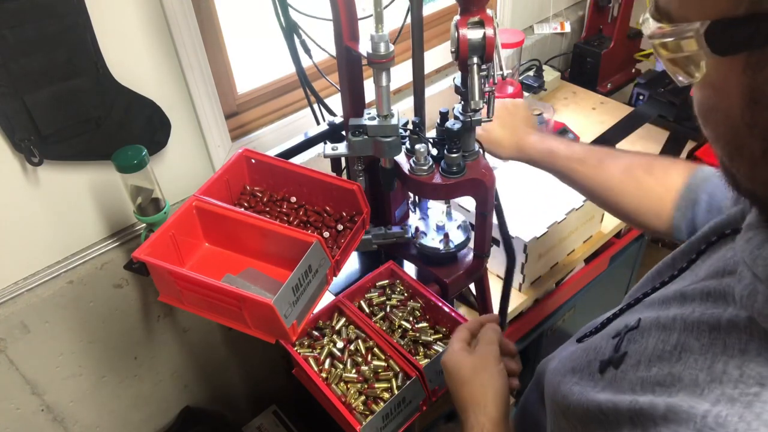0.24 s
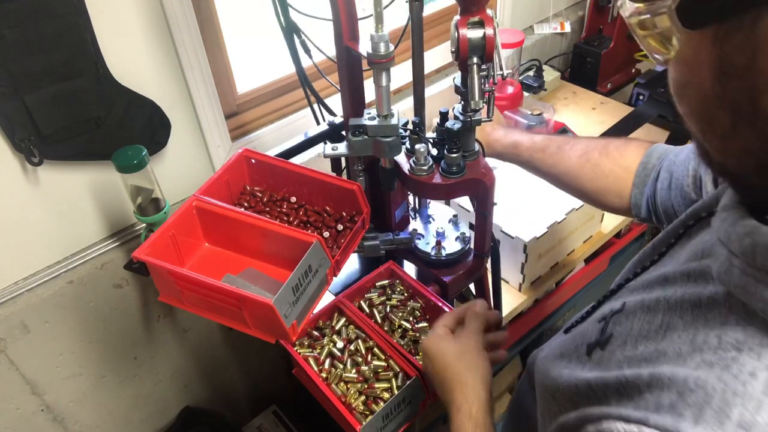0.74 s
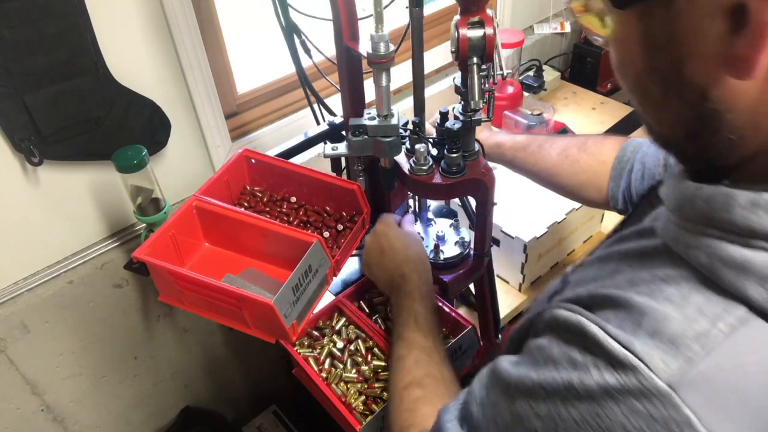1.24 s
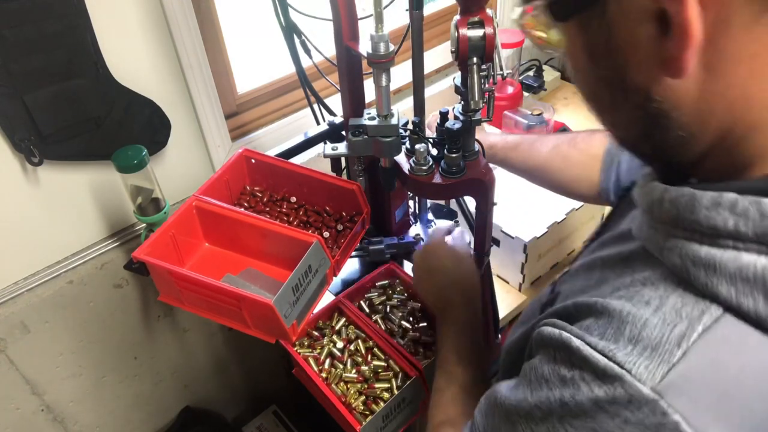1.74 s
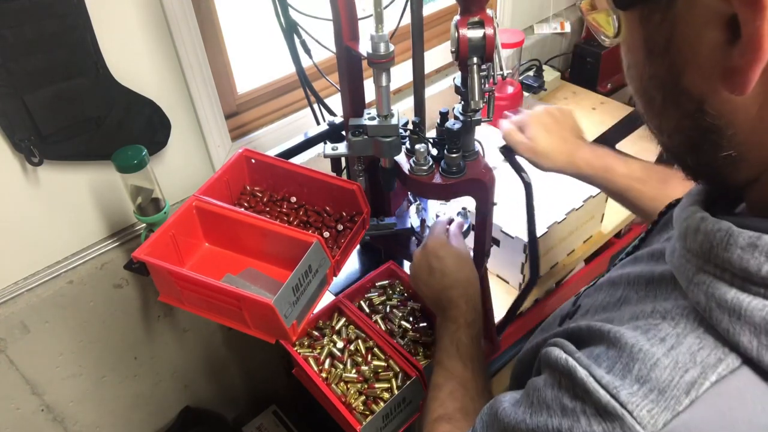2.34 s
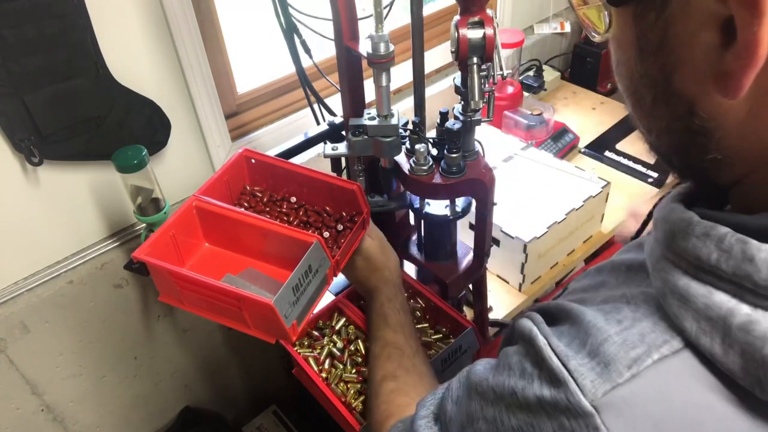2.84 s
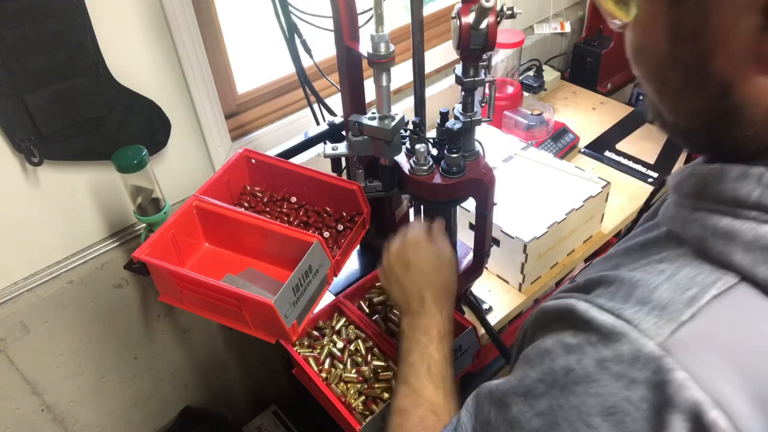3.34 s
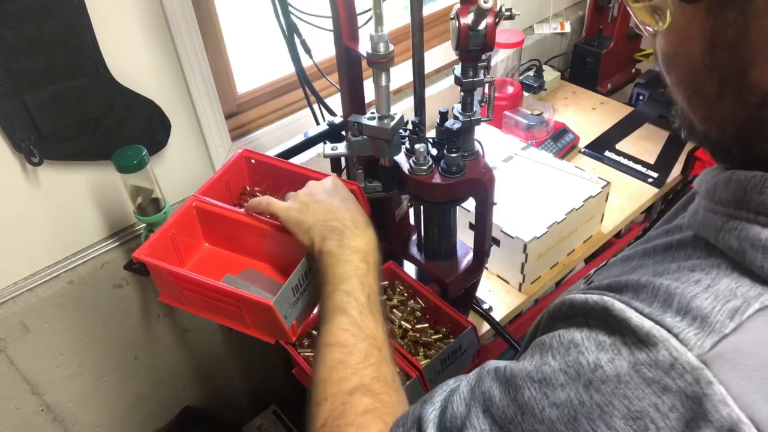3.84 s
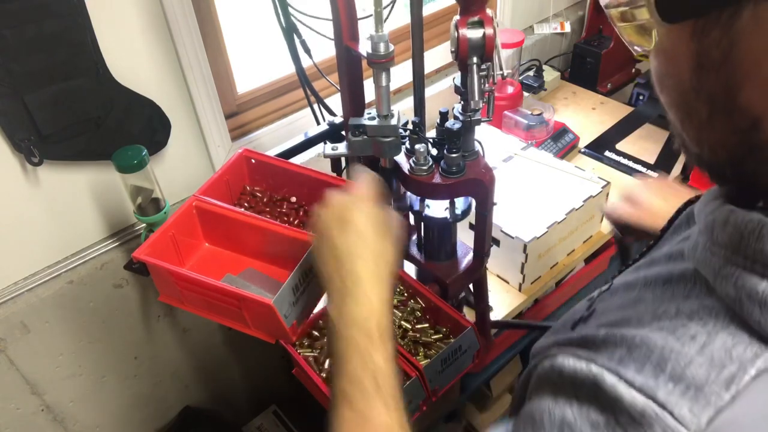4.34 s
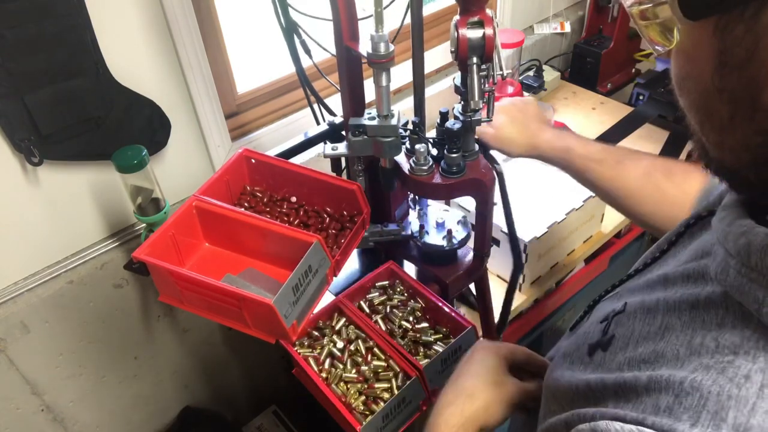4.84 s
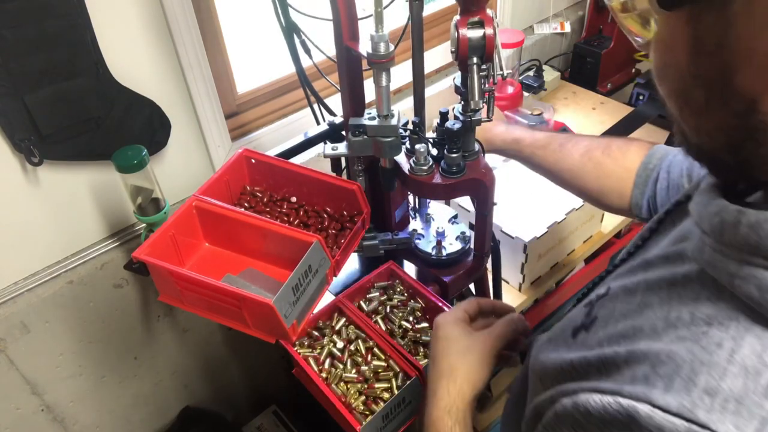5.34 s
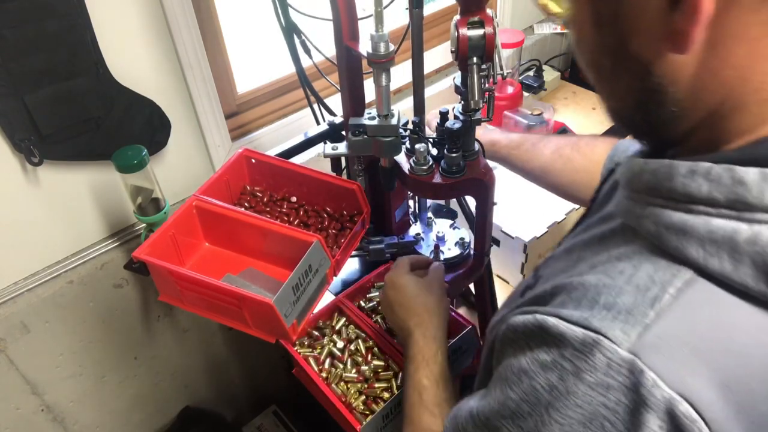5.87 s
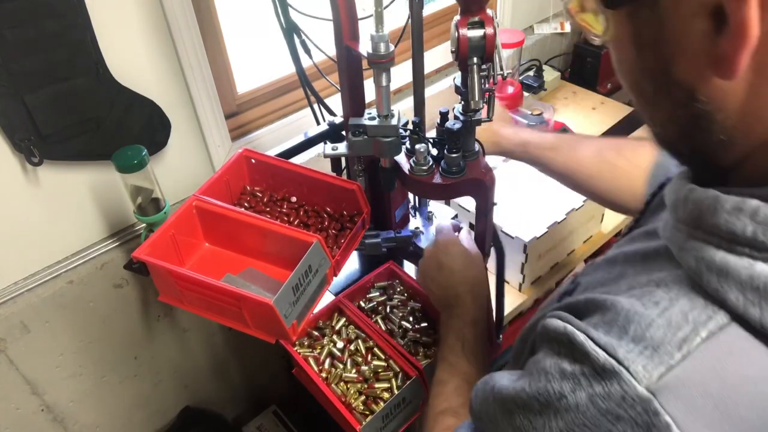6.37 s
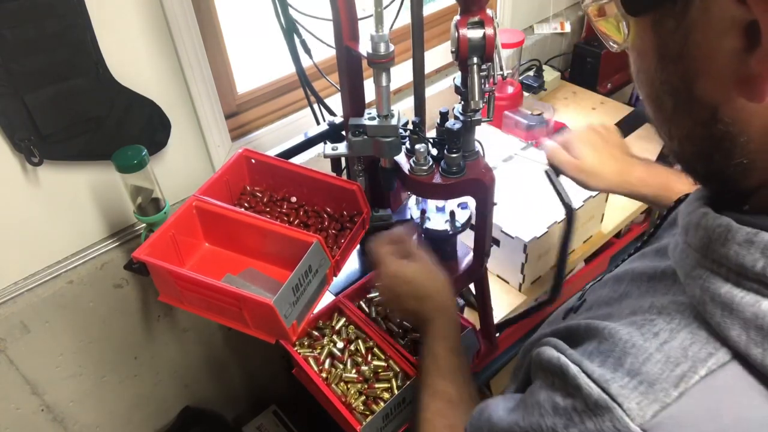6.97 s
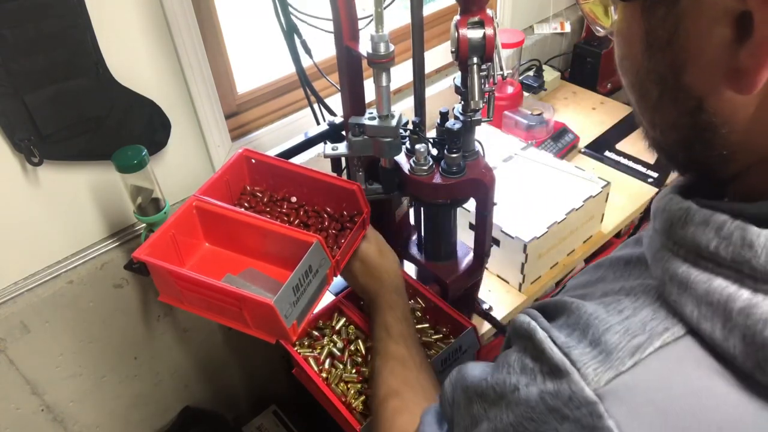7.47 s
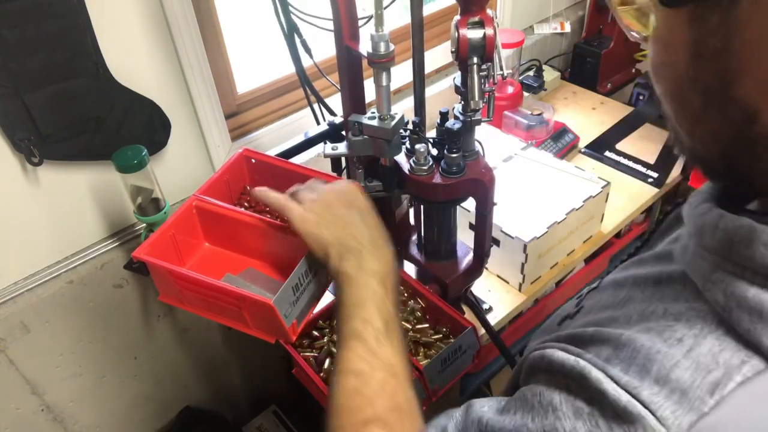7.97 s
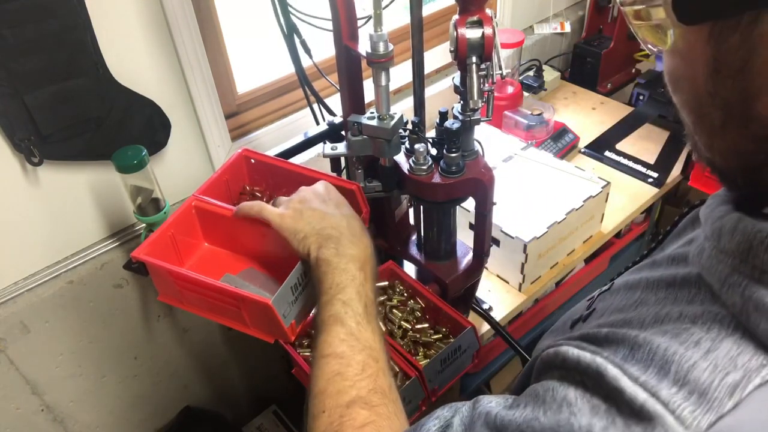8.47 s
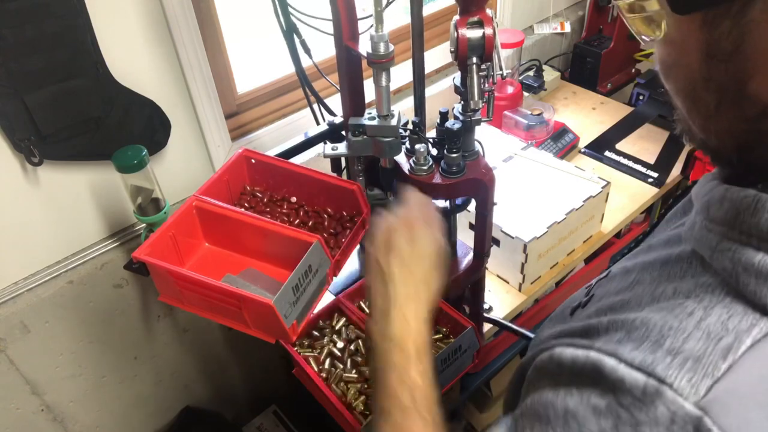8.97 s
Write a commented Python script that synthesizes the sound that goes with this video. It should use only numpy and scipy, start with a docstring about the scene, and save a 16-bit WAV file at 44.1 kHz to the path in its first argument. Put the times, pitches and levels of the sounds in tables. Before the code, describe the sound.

A few light steel clicks from a hand-worked press open over a faint electrical hum in a small workshop. At 0.5 seconds a cartridge drops sharply into a plastic bin and bounces to rest. A dull lever thud comes at 1.4 seconds, followed by sparse ticks. From 3 to 4.2 seconds, clicks, short rattles and soft bench thuds grow busier, ending in a loud metal clack. A feeder motor whirs softly from 4.3 to 6.7 seconds. Another cartridge bounces in the bin at 5.2 seconds, then brass cases tumble loudly from 5.5 to 6.5 seconds with a hollow rattle and thin, high ringing. After a lull with a few ticks, the feeder whirs again from 7.5 to 8.9 seconds, with soft thuds and more bursts of clinking, jingling cases. Two faint clicks close it at about 9 seconds.

```python
"""Steel parts click on a hand-worked loading press, over the mains hum of a small, quiet workshop.
Cartridges drop and bounce in a plastic bin, struck brass cases ring thin and high, and the lever
thuds on its stops, shaking the bench. A feeder whirs twice, tumbling cases in its resonant bowl."""
import sys
import numpy as np
from scipy import signal
from scipy.fft import rfft, irfft, next_fast_len
from scipy.io import wavfile
from scipy.ndimage import uniform_filter1d, map_coordinates

SR = 44100
rng = np.random.default_rng(int(sys.argv[2]) if len(sys.argv) > 2 else 0)


def to_wav(sig):
    """Store sig (one row per channel, or 1-D mono) as 16-bit WAV at the path in sys.argv[1].

    Samples outside -1..1 are clipped; the rate is SR.
    """
    pcm = np.clip(np.atleast_2d(sig), -1, 1) * 32767
    pcm = np.round(pcm).astype(np.int16)
    wavfile.write(sys.argv[1], SR, pcm.T)  # frames by channels


N = 406137

# plastic bin wall: pitch_hz, level_db, t60_s
BIN_MODES = [(870, -10, .025), (1000, -5, .03), (1110, 0, .035), (1292, -3, .03)]
# feeder bowl: centre_hz, width_hz, level_db
BOWL_MODES = [(350, 58, -3.5), (735, 31, 0.5), (933, 47, -1), (1103, 4, 7), (1200, 7.4, 4.5),
              (1570, 590, -10), (2860, 670, -9.5), (4340, 6100, -22.5)]
# hollow pile of cases: centre_hz, width_hz, level_db
PILE_MODES = [(347.8, 30, -2.5), (894, 157, 2), (1102, 356, -2), (1428, 220, 0.5), (1980, 384, -6.5)]
# feeder turning: start_s, end_s, level_db
FEEDER_RUNS = [(4.253, 6.652, -43), (7.465, 8.924, -41.5)]
# a round bouncing in the bin: start_s, end_s
BIN_DROPS = [(.52, 1.0), (5.18, 5.4)]


def amp(db):
    return 10 ** (np.asarray(db) / 20)


def unit_rms(x):
    return x / np.sqrt(np.mean(x ** 2) + 1e-20)


def log_interp(points, hz):
    """Interpolate (hz, value) points on a log axis."""
    points_hz, values = np.transpose(points)
    return np.interp(np.log(hz + 1), np.log(points_hz + 1), values)


def wobble(rate_hz):
    """Smooth random curve, knots at rate_hz."""
    knots = rng.standard_normal(int(N * rate_hz / SR) + 4)
    return map_coordinates(knots, [np.arange(N) * rate_hz / SR])


def filtered(x, response):
    """Apply a complex frequency response."""
    size = next_fast_len(N + SR // 2)
    return irfft(rfft(x, size) * response(np.fft.rfftfreq(size, 1 / SR)), size)[..., :N]


def band(x, lo_hz, hi_hz):
    sos = signal.butter(2, [lo_hz, min(hi_hz, .45 * SR)], "bandpass", fs=SR, output="sos")
    return signal.sosfilt(sos, x)


def resonances(modes):
    """Causal response of parallel resonators, alternating in sign."""
    return lambda hz: sum((-1) ** k * amp(db) * 1j * hz * width / (centre**2 - hz**2 + 1j * hz * width)
                          for k, (centre, width, db) in enumerate(modes))


def add(track, start_s, sound):
    part = track[round(start_s * SR):][:len(sound)]
    part += sound[:len(part)]


def room_tone():
    """Quiet air and unsteady mains hum."""
    # air spectrum: freq_hz, relative_db
    air_spectrum = [(25, -20), (64, -1.5), (100, -10), (540, -12.5), (900, -17), (3000, -31), (16000, -38)]
    air = unit_rms(filtered(rng.standard_normal(N), lambda hz: amp(log_interp(air_spectrum, hz))))
    hum = np.sin(2 * np.pi * 59.5 * np.arange(N) / SR + 0.39 * wobble(2.8))
    return amp(-59 + 1.5 * wobble(4)) * air + amp(-61.5) * hum


def contacts():
    """Metal strikes: a dry click, a sizzle and a knock on the bin wall or into the pile."""
    # strikes: start_s, level_db, optional knock_db and sizzle_db (offsets to level_db)
    hits = [(0.1148, -28), (0.159, -34), (0.295, -34), (0.367, -33.5), (0.429, -31, 4.5, 6.5),
            (0.5285, -6.5, 0.5, -15), (0.5395, -9, 2, -25), (0.5791, -12, -10, -30), (0.632, -20),
            (0.7123, -29.5), (0.8739, -20, -8.5, -5.5), (1.0159, -45, -11, 23), (1.3383, -27.5),
            (1.4473, -24, -16, -11.5), (1.896, -41.5), (2.0046, -32), (2.086, -29, 3, -12), (2.378, -14),
            (2.826, -42), (2.947, -33), (3.0492, -20, -26, -13), (3.0638, -22), (3.087, -23), (3.175, -26),
            (3.192, -24), (3.2954, -24, -21, 1), (3.3792, -27), (3.409, -30), (3.4271, -12.5), (3.555, -22),
            (3.583, -19.5), (3.8915, -34), (4.024, -23, 0, -32), (4.055, -28), (4.0669, -20),
            (4.117, -10.5), (4.201, -17), (4.215, -14, -4, -15), (4.2346, -3, -7, -16), (5.081, -33),
            (5.191, -7, 0, -13), (5.1998, -7, 0, -20), (5.24, -20), (5.292, -7.5, -5, -28), (5.376, -27),
            (5.4832, -15), (5.513, -5.5, -22, -34.5), (5.57, -15, -18, -30), (5.601, -22, -14, 0),
            (5.6359, -7.5, -16, -18.5), (5.716, -14), (5.735, -9), (5.773, -18, 10, -18.5), (5.852, -16),
            (5.894, -11), (5.938, -13.5, 6, -28), (5.99, -18.5, 9, -19), (6.052, -22, 15, -13.5),
            (6.125, -11), (6.223, -14), (6.3465, -12.5, -15, -17), (6.426, -14), (6.505, -26, 10, -18),
            (6.544, -16), (6.7036, -25), (6.7919, -19), (6.982, -34, -35, -0.5), (7.0335, -35),
            (7.1825, -34), (7.303, -30, -8, -12), (7.472, -31), (7.486, -27), (7.53, -25), (7.581, -26),
            (7.6042, -16, 2, -2), (7.641, -20, 5, -7), (7.724, -21), (7.86, -23), (7.873, -12, -14, -4),
            (7.95, -19, -14, -25), (8.006, -14), (8.0162, -13.5), (8.2439, -7, -11.5, -35), (8.299, -18),
            (8.3563, -5.5, -19, -32), (8.385, -13), (8.4485, -11), (8.525, -8), (8.549, -11, 2, -18),
            (8.622, -9), (8.6809, -13.5), (8.772, -21), (8.8406, -12, -11.5, -3.5), (9.0362, -30, -12, -16),
            (9.134, -38, 4, -16)]
    # fingers damping loose pieces: start_s, end_s
    handling = [(3.5, 3.8), (7, 7.4)]
    steel_db, loose_db, held_db = (-11, -2), (-4, -14), (-4, -32)  # default (knock, sizzle)
    clink_t60_s = .022
    click, sizzle, wall, pile = np.zeros((4, N))
    t = np.arange(SR // 10) / SR
    for start_s, db, *colour_db in hits:
        # in the turning feeder's rattle, a blow spreads over many pieces
        feeding = any(on < start_s < off for on, off, _ in FEEDER_RUNS)
        rattle_db = 20 * np.log10(rattle_gains(start_s)[0])
        spread = feeding * np.clip((rattle_db + 44) / 8, 0, 1)
        in_bin = any(on < start_s < off for on, off in BIN_DROPS)
        held = any(on < start_s < off for on, off in handling)
        default_db = held_db if held else loose_db if in_bin or spread else steel_db
        knock_db, sizzle_db = colour_db or default_db
        softness, size = rng.random(), np.exp(rng.normal(0, .25))
        rise_s = 0.00054 + (0 if in_bin else 0.0035 * softness + 0.003 * spread)
        rise = 1 - np.exp(-t / rise_s)
        blow, settling = amp(-60 * t / (0.014 + 0.04 * spread)), amp(-11 - 60 * t / 0.07)
        snap = rise * (blow + settling)
        shove = (1 - np.exp(-t / 0.0036)) * amp(-60 * t / (0.038 + 0.025 * spread))
        click_noise, sizzle_noise, pile_noise = rng.standard_normal((3, len(t))) * [snap, snap, shove]
        add(click, start_s, amp(db + 3) * band(click_noise, 1600 / size, 5400 / size))
        for hz in 1500 * 5 ** rng.random(4):  # the piece's own modes
            clink = amp(db + rng.normal(-15, 3) - 60 * t / clink_t60_s) * rise
            add(click, start_s, clink * np.sin(2 * np.pi * hz * t))
        add(sizzle, start_s, amp(db + sizzle_db + 8) * sizzle_noise * snap ** .4)
        detune, wall_gain, pile_gain = (.02, 1, .3) if in_bin else (.1, .4, 1)
        wall_ring = sum(amp(mode_db + rng.normal(0, 2) - 60 * t / t60_s)
                        * np.sin(2 * np.pi * hz * rng.normal(1, detune) * t)
                        for hz, mode_db, t60_s in BIN_MODES)
        add(wall, start_s, amp(db + knock_db + 1.5) * wall_gain * rise * wall_ring)
        add(pile, start_s, amp(db + knock_db + 15) * pile_gain * pile_noise)
    hollow = filtered(pile, lambda hz: resonances(PILE_MODES)(hz) + .5 * resonances(BOWL_MODES)(hz))
    return click + band(sizzle, 4300, 22000) + band(wall + hollow, 330, 2700)


def rattle_gains(t):
    """Body and rustle gains: each bout sets in fast, swells, fades and settles."""
    # loose rounds and cases rattling: start_s, climax_s, end_s, climax_db
    bouts = [(0.553, 0.62, 1.0, -42), (1.935, 2.096, 2.3, -50), (3.065, 3.1, 3.3, -37),
             (3.42, 3.57, 3.95, -45), (5.471, 5.965, 6.55, -27), (7.832, 8.013, 8.166, -30),
             (8.227, 8.383, 8.385, -29), (8.494, 8.611, 8.92, -29)]
    swell_db, onset_db_per_s, settle_db_per_s = 12.5, 300.5, 81.5
    rest_db, feeding_db = -70, -48.5
    feeding = sum((on < t) & (t < off) for on, off, _ in FEEDER_RUNS) * amp(feeding_db)
    body, rustle = amp(rest_db) + feeding, amp(rest_db) + feeding * amp(-5.5)
    for start_s, climax_s, end_s, climax_db in bouts:
        shape_db = np.interp(t, [start_s - 1, start_s, climax_s, end_s, end_s + 1],
                             [-onset_db_per_s, 0, swell_db, 0, -settle_db_per_s])
        gain = amp(climax_db - swell_db + shape_db)
        body, rustle = np.hypot(body, gain), np.hypot(rustle, gain * amp(-2))
    return body, rustle


def tumbling():
    """Random taps over sliding noise: hollow in the pile or bin, bright from metal on metal."""
    # metal rustle before weighting by piece size: freq_hz, relative_db
    rustle_spectrum = [(1500, -27.5), (2500, -1.5), (6100, -5.5), (8500, -21), (16000, -11)]
    # click bands of big, middling and small pieces: centre_hz
    pieces_hz = np.array([[2400], [5000], [11500]])
    t = np.arange(N) / SR
    body_gain, rustle_gain = rattle_gains(t)
    taps_per_s = np.array([[70], [45], [45], [45]])  # knocks, then the three sizes
    sliding, tap_decay_s = .23, .005
    taps = (rng.random((4, N)) < taps_per_s / SR) * amp(2.5 * rng.exponential(size=(4, N)).clip(0, 2))
    taps[1] += .5 * taps[0]  # knocks also click
    envelopes = sliding + signal.lfilter([1], [1, -np.exp(-1 / (tap_decay_s * SR))], taps)
    knocks, *clicks = envelopes * rng.standard_normal((4, N))
    pile = unit_rms(band(filtered(knocks, resonances(PILE_MODES)), 240, 4020))
    wall = unit_rms(filtered(knocks, resonances([(hz, 13 / t60_s, db) for hz, db, t60_s in BIN_MODES])))
    in_bin = sum((on < t) & (t < off) for on, off in BIN_DROPS)
    body = np.where(in_bin, wall + .6 * pile, pile)
    rustles = filtered(np.array(clicks), lambda hz: amp(log_interp(rustle_spectrum, hz)
                                                        - 9 * np.log2((hz + 1) / pieces_hz) ** 2))
    return body_gain * body + rustle_gain * unit_rms(rustles.sum(axis=0))


def case_pings():
    """Single brass cases, struck and left to ring."""
    # pings: start_s, pitch_hz, level_db
    pings = [(1.018, 10231, -46), (3.429, 12724, -29), (4.067, 6054, -39), (4.12, 6054, -37),
             (4.51, 13370, -47), (6.428, 12038, -36), (6.432, 11256, -21), (7.605, 10714, -36),
             (7.875, 10707, -32)]
    rise_s, t60_s = 0.002, 0.32
    out, t = np.zeros(N), np.arange(SR // 2) / SR
    for start_s, hz, db in pings:
        envelope = amp(db - 60 * t / t60_s) * (1 - np.exp(-t / rise_s))
        add(out, start_s, envelope * np.sin(2 * np.pi * hz * t))
    return out


def lever_thuds():
    """Soft blows: a dull puff through the bench, which booms and hums on."""
    # lever and bench blows: start_s, level_db
    thuds = [(1.445, -23), (2.197, -41), (3.068, -24.5), (3.383, -29), (3.567, -36), (3.89, -39),
             (4.039, -35), (4.203, -28), (7.604, -31), (7.645, -30), (7.996, -23)]
    # bench sway, bench top, press frame: pitch_hz, level_db, t60_s
    bench_modes = [(105, -18, .3), (305, -6, .2), (528, -33, 2.5)]
    puffs, bench = np.zeros((2, N))
    t = np.arange(SR) / SR
    for start_s, db in thuds:
        envelope = amp(db + 11 - 60 * t / 0.2) * (1 - np.exp(-t / 0.001))
        add(puffs, start_s, envelope * rng.standard_normal(len(t)))
        boom = sum(amp(rng.normal(mode_db, 2) - 60 * t / t60_s)
                   * np.sin(2 * np.pi * hz * rng.normal(1, .007 / t60_s) * t)
                   for hz, mode_db, t60_s in bench_modes)
        add(bench, start_s, amp(db) * (1 - np.exp(-t / 0.0015)) * boom)
    return band(puffs, 173, 980) + bench


def jostling_brass():
    """Thin high tones from cases struck again and again."""
    # sustained rings: start_s, end_s, pitch_hz, level_db
    tones = [(2.96, 3.045, 14800, -42), (3.2, 3.42, 12722, -42), (5.501, 6.3, 11465, -37),
             (5.72, 6.3, 11948, -38), (5.86, 6.4, 11170, -39), (8.24, 8.5, 11480, -38),
             (8.52, 8.86, 11440, -34)]
    strikes_per_s, decay_s, fade_s = 220, .024, 0.034
    out, t = np.zeros(N), np.arange(N) / SR
    drift_hz = 70 * wobble(150)
    for start_s, end_s, hz, db in tones:
        span = slice(round(start_s * SR), round(end_s * SR))
        n = len(t[span])
        strikes = (rng.random(n) < strikes_per_s / SR) * rng.normal(.25, .6, n)  # most add, some damp
        strikes[0] = 1
        ring = signal.lfilter([1], [1, -np.exp(-1 / (decay_s * SR))], strikes)
        envelope = unit_rms(uniform_filter1d(ring, size=30)) * np.clip((end_s - t[span]) / fade_s, 0, 1)
        pitch_hz = hz + np.roll(drift_hz, rng.integers(N))[span]
        add(out, start_s, amp(db) * envelope * np.sin(2 * np.pi * np.cumsum(pitch_hz) / SR))
    return out


def feeder_whir():
    """Steady motor noise in the bowl's resonances."""
    t, ramp_s = np.arange(N) / SR, 0.037
    gain = sum(amp(db) * np.clip(np.minimum(t - on, off - t) / ramp_s, 0, 1)
               for on, off, db in FEEDER_RUNS)
    return gain * unit_rms(band(filtered(rng.standard_normal(N), resonances(BOWL_MODES)), 220, 16000))


def workshop_reverb(x):
    """Short diffuse tail; treble dies sooner."""
    # room decay: freq_hz, t60_s
    decay = [(500, 0.29), (10000, 0.23)]
    hz, t, noise = signal.stft(rng.standard_normal(SR // 2), SR, nperseg=256)
    tail = signal.istft(noise * amp(-60 * t / log_interp(decay, hz)[:, None]), SR, nperseg=256)[1]
    delayed = np.pad(x, (150, 0))
    return signal.fftconvolve(delayed, tail / np.linalg.norm(tail))[:N]


def scene():
    """Mono mix; only the blows get reverb."""
    blows = contacts() + lever_thuds() + tumbling()
    reverb = amp(-9) * workshop_reverb(blows)
    return (blows + reverb + feeder_whir() + jostling_brass() + case_pings() + room_tone())[None]


def record(dry):
    """Rounded peaks, the microphone's treble dip and a band limit."""
    ceiling, dip_hz, dip_width_hz, top_hz = .95, 10300, 800, 15900
    rounded = dry / (1 + np.abs(dry / ceiling) ** 6) ** (1 / 6)
    return filtered(rounded,
                    lambda hz: (hz < top_hz) * (1 - .5 * np.exp(-((hz - dip_hz) / dip_width_hz) ** 2)))


dry = scene()
out = record(dry)
to_wav(out)
```